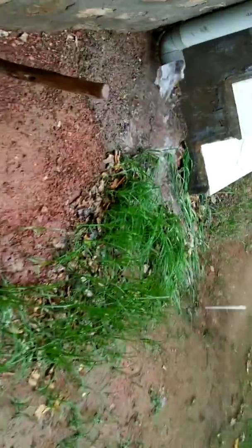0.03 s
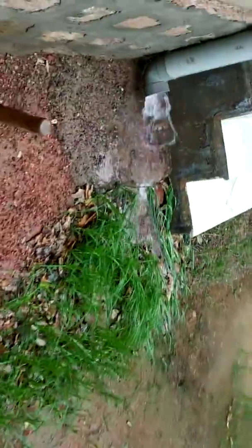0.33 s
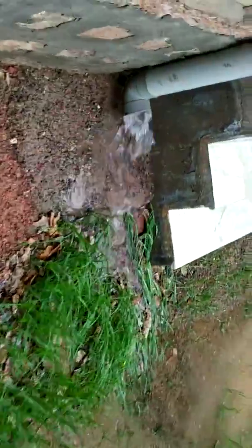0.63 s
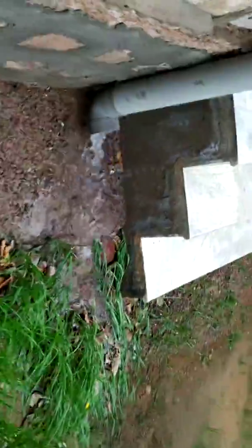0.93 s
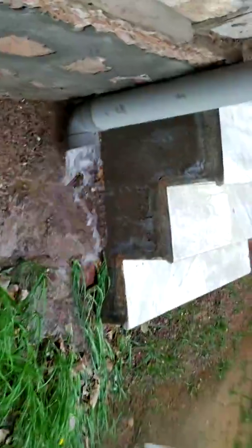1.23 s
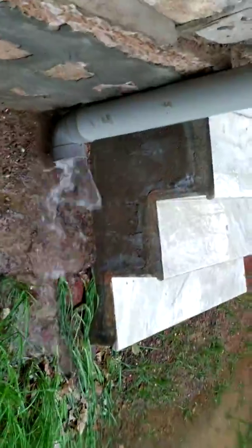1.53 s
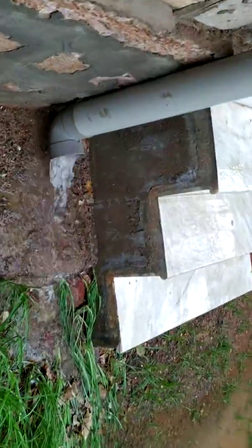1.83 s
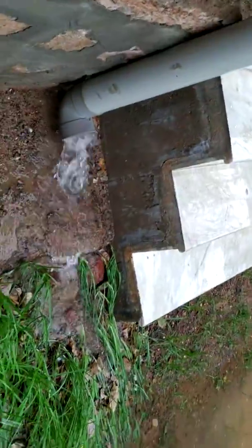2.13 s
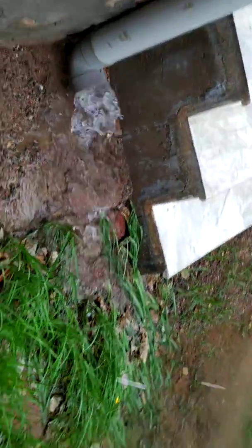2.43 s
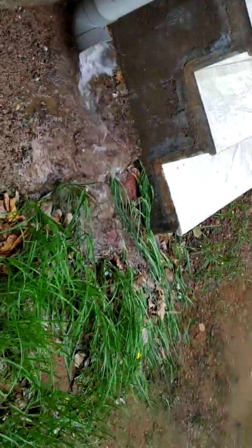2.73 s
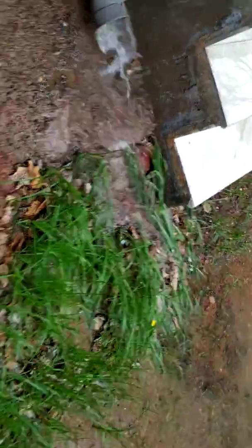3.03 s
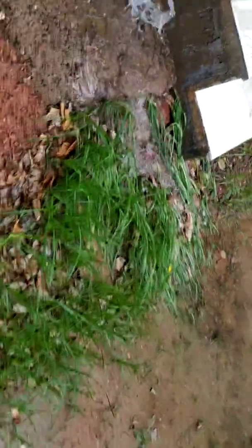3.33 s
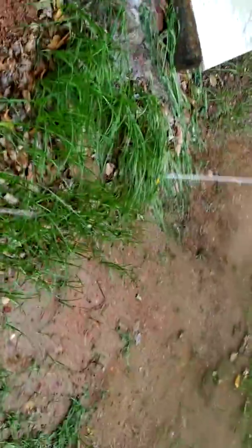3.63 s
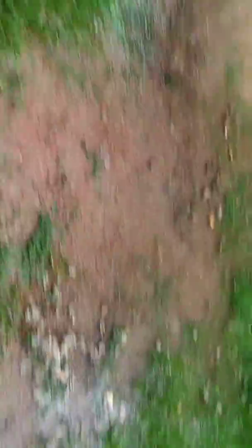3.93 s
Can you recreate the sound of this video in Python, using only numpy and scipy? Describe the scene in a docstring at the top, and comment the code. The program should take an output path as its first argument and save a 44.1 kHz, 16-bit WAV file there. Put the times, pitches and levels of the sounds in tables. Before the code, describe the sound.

Water gushes from a drainpipe and splatters onto wet gravel, with light wind rumble.

```python
"""Drainpipe on wet gravel

Rainwater gushes from a pipe beside a house wall. The uneven flow throws a fine spray, ticks on the
stones and traps ringing bubbles in the puddle; larger splats slap down and single drops snap close by.
Water churns at the pipe mouth and ripples away over the gravel. Light wind rumbles on the microphone."""
import sys
import numpy as np
from scipy import signal
from scipy.fft import rfft, irfft
from scipy.io import wavfile

SR = 44100
rng = np.random.default_rng(int(sys.argv[2]) if len(sys.argv) > 2 else 0)


def wav_out(sig):
    """Save sig, one row per channel (or a flat mono array), as 16-bit PCM at SR to the path in sys.argv[1]."""
    wavfile.write(sys.argv[1], SR, np.round(np.clip(np.atleast_2d(sig).T, -1, 1) * 32767).astype(np.int16))


N = 176400
TIME = np.arange(N) / SR
FLUTTER_DB, FLUTTERS_PER_S = 3, 51  # unevenness of the gurgle and the runoff

# The finest treble of spray and droplets. Each row: time in seconds, lift over the rest in dB.
TREBLE_LIFT = [(0, 3), (.7, 1), (1.3, -1), (1.8, 3), (2.2, 0), (2.8, 0), (3.3, -1), (3.6, 3.5), (4, 5)]


def from_db(db):
    """Decibels to gain."""
    return 10 ** (np.asarray(db) / 20)


def rms_one(x):
    """Scale to unit rms."""
    return x / np.sqrt(np.mean(x ** 2) + 1e-20)


def in_time(rows):
    """Read a curve at every sample."""
    return np.interp(TIME, *np.transpose(rows))


def at_hz(points, hz):
    """Read a spectrum on a log-frequency axis."""
    points_hz, points_db = np.transpose(points)
    return np.interp(np.log(hz), np.log(points_hz), points_db)


def drift(rate_hz):
    """A smooth random curve with a spread of about 1."""
    step, settle = 40, 2000
    pole = np.exp(-2 * np.pi * rate_hz * step / SR)
    noise = rng.standard_normal(N // step + settle + 2)
    slow = signal.lfilter([1], [1, -2 * pole, pole * pole], noise)[settle:]
    return np.interp(np.arange(N) / step, np.arange(len(slow)), rms_one(slow))


def band_noise(low_hz, high_hz):
    """Noise of unit rms between two edges."""
    sos = signal.butter(2, [low_hz, high_hz], "band", fs=SR, output="sos")
    return rms_one(signal.sosfilt(sos, rng.standard_normal(N)))


def drop_sizes(spread_db):
    """Many small drops and a few large ones, one gain per sample."""
    return from_db(spread_db * np.minimum(rng.exponential(1, N), 4.5))


def treble_gain(db, hz):
    """A gain that acts only above 9800 Hz."""
    return from_db(db * (hz > 9800))


def add(out, start_s, sound):
    """Mix a short sound in at its time."""
    i = int(np.clip(start_s * SR, 0, N - 1))
    out[i:i + len(sound)] += sound[:N - i]


def gush():
    """The pipe's output as a gain of unit rms: a steady flow, sloshes and quick chance surges."""
    # Strength of the steady flow. Each row: time in seconds, relative level in dB.
    steady_flow = [(0, -40.5), (.35, -41.5), (.6, -39), (.85, -40.5), (1.3, -35.5), (1.65, -37.5),
                   (2.05, -37.5), (2.7, -37.5), (3.0, -37.5), (3.4, -39.5), (3.7, -40.5), (4, -41.5)]
    # The pipe spills in sloshes. Each row: start in seconds, length in seconds, lift in dB.
    sloshes = [(0.09, 0.07, 0.5), (.25, 0.047, 5), (0.362, 0.16, 2), (0.63, 0.2, 1.1), (0.883, 0.12, 3.5),
               (1.266, 0.19, 2.5), (1.445, 0.15, 2.5), (1.739, 0.076, 5.5), (1.852, 0.13, 2),
               (2.091, 0.075, 1.5), (2.21, 0.11, 3.5), (2.373, 0.12, 4), (2.55, 0.13, 3),
               (2.673, 0.13, 2.8), (2.852, 0.13, 3), (3.09, 0.09, 3.5), (3.225, 0.08, 3.5),
               (3.463, 0.07, 3), (3.534, 0.088, 4), (3.757, 0.13, 3)]
    surge_db, slosh_edge_s = 1.05, 0.013
    db = in_time(steady_flow) + surge_db * drift(rate_hz=27)
    for start_s, length_s, lift_db in sloshes:
        inside_s = np.minimum(TIME - start_s, start_s + length_s - TIME)
        db += lift_db * np.clip(inside_s / slosh_edge_s + .5, 0, 1)
    return rms_one(from_db(db))


def spray(flow):
    """Each small splash is a burst of hiss a few milliseconds long, with a colour of its own."""
    # Colour of the spray. Each row: frequency in Hz, relative spectral density in dB.
    spectrum = [(300, 0), (600, -15.5), (1100, -6), (1600, -2.5), (2200, 2.5), (3000, 3.5), (4300, 2.5),
                (7000, -2), (9000, -1), (12000, -1.5), (16000, -18)]
    splashes_per_s, decay_s, colour_db = 600, 0.0064, 3
    hits = (rng.random(N) < splashes_per_s / SR) * drop_sizes(spread_db=1.5) * flow
    power_kept = np.exp(-2 / (decay_s * SR))
    edges_hz = np.geomspace(300, 17000, 17)
    treble_db, out = in_time(TREBLE_LIFT), 0
    for low, high in zip(edges_hz, edges_hz[1:]):
        strength = hits * from_db(colour_db * np.clip(rng.standard_normal(N), -2, 2))
        envelope = np.sqrt(signal.lfilter([1], [1, -power_kept], strength ** 2 + 1e-18))
        hiss = rms_one(envelope * treble_gain(treble_db, high) * band_noise(low, high))
        out += from_db(at_hz(spectrum, np.sqrt(low * high))) * np.sqrt(high - low) * hiss
    return from_db(-41.5) * rms_one(out)


def droplets(flow):
    """Droplets tick on the wet stones, each ringing a few cycles at its own pitch and bouncing once."""
    # Colour of the ticks. Each row: pitch in Hz, relative weight in dB.
    spectrum = [(500, -17), (1100, -1.5), (1600, -17.5), (2200, -2.5), (3000, -5.5), (4300, -0.5),
                (7000, -4.5), (9000, 0), (12000, -7), (16000, -1)]
    ticks_per_s, ring_cycles, longest_bounce_s, bounce_gain = 4200, 4, 0.0045, 0.82
    chance, sizes = rng.random((N, 4)), drop_sizes(spread_db=2.3) * flow
    born = np.flatnonzero(chance[:, 0] < ticks_per_s / SR)
    _, pitch, bounce, polarity = chance[born].T[:, :, None]
    hz, t = 500 + 15500 * pitch ** 1.3, TIME[:SR // 150]
    rings = np.sin(2 * np.pi * hz * t) * np.exp(-t * hz / ring_cycles) * (1 - t / t[-1])
    colour = hz * from_db(at_hz(spectrum, hz)) * treble_gain(in_time(TREBLE_LIFT)[born, None], hz)
    ticks = rings * np.sign(polarity - .5) * sizes[born, None] * colour
    first = born[:, None] + np.arange(len(t))
    second = first + (longest_bounce_s * bounce * SR).astype(int)
    landing, rebound = (np.bincount(at.ravel(), ticks.ravel(), N)[:N] for at in (first, second))
    return from_db(-41.5) * rms_one(landing + bounce_gain * rebound)


def bubble(hz, decay_cycles, churn):
    """A trapped bubble rings briefly, rising in pitch, shaken by the churning water; peak 1."""
    attack_cycles, rise_per_s, roughness = 1.03, 5.2, 0.47
    t = TIME[:len(churn)]
    envelope = (1 - np.exp(-t * hz / attack_cycles)) * np.exp(-t * hz / decay_cycles)
    phase = 2 * np.pi * hz * (t + rise_per_s * t * t / 2)
    ring = envelope * np.imag((1 + roughness * churn) * np.exp(1j * phase))
    return ring / np.abs(ring).max()


def puddle(flow):
    """Clear plops and a few low slaps among random low glugs, middle bubbles and tiny high pings."""
    # Clear bubble plops and a few short, low slaps of water (those that die in a cycle or two).
    # Each row: start in seconds, peak in dB, pitch in Hz, decay in cycles.
    plops_and_slaps = [(.235, -38.5, 1650, 6), (.283, -35.5, 2200, 7), (.402, -31, 1990, 7),
                       (.403, -34, 1620, 4.5), (0.421, -35, 1960, 7), (0.496, -34, 2690, 10),
                       (.784, -32, 4430, 12), (0.931, -32.5, 2380, 9), (0.933, -26, 8250, 14),
                       (1.043, -34, 2360, 8), (1.051, -40, 890, 3), (1.068, -33, 2370, 9),
                       (1.341, -27, 3200, 7.3), (1.365, -30, 3860, 10), (1.396, -25.5, 2840, 9),
                       (1.537, -31, 2190, 6.5), (1.551, -21, 11000, 14), (1.62, -39.5, 1110, 5.9),
                       (1.776, -35, 1660, 7), (1.793, -36, 1500, 5.4), (1.852, -39.5, 1140, 5),
                       (1.872, -29.5, 1850, 8), (1.906, -30, 2800, 12), (2.134, -24.5, 3440, 8),
                       (2.149, -33, 2400, 8), (2.19, -30, 2340, 7), (2.201, -29, 1930, 3.6),
                       (2.2023, -32.5, 1020, 2.1), (2.238, -30, 1550, 5.4), (2.298, -38, 750, 2),
                       (2.431, -30, 2320, 5), (2.562, -29.5, 2150, 7.7), (2.633, -30, 2370, 4.2),
                       (2.645, -40.5, 1320, 4.6), (2.654, -21.5, 3500, 5), (2.671, -28, 2430, 8),
                       (2.704, -36, 1420, 3.3), (2.707, -36, 480, 1.1), (2.708, -40, 950, 1.5),
                       (2.7498, -22.5, 2170, 12), (2.765, -36, 1760, 8.2), (2.781, -26.5, 2580, 8.6),
                       (2.849, -38, 1470, 6.9), (2.859, -28.5, 1980, 7), (2.86, -28.5, 2600, 7),
                       (3.164, -35.5, 1380, 6.7), (3.169, -33, 2180, 5.4), (3.2369, -20.5, 4840, 9),
                       (3.2378, -25, 4080, 8.6), (3.276, -29, 2430, 7.2), (3.365, -37.5, 1600, 3.6),
                       (3.463, -23, 5100, 12), (3.465, -30.5, 3270, 8), (3.562, -32, 1426, 5.2),
                       (3.887, -31.5, 2270, 9)]
    # Families of random bubbles. Each row: bubbles per second, typical peak in dB at unit flow,
    # centre pitch in Hz, spread in octaves.
    families = [(55.5, -54, 1100, 0.4), (170, -48, 2250, 0.304), (170.4, -42, 5600, 0.443),
                (170, -40.5, 11500, 0.24)]
    churn_hz, size_spread_db, splash_db, splash_decay_s = 350, 4, -17, 0.004
    out, length = np.zeros(N), SR // 25
    churn = np.pad(drift(churn_hz) + 1j * drift(churn_hz), (0, length))
    splash, fade = band_noise(1700, 6500), np.exp(-TIME[:length] / splash_decay_s)
    for start_s, db, hz, cycles in plops_and_slaps:
        i = int(start_s * SR)
        add(out, start_s, from_db(db + splash_db) * fade * splash[i:i + length])
        add(out, start_s, from_db(db) * bubble(hz, cycles, churn[i:i + length]))
    for per_s, db, centre_hz, octaves in families:
        chance = np.clip(rng.standard_normal((N, 2)), -2.5, 2)
        for i in np.flatnonzero(rng.random(N) < per_s / SR):
            strength, pitch = chance[i]
            gain = flow[i] * from_db(db + size_spread_db * strength)
            hz = centre_hz * 2 ** (octaves * pitch)
            cycles = 6.8 * (hz / 2300) ** 0.47  # smaller bubbles ring for more cycles
            add(out, i / SR, gain * bubble(hz, cycles, churn[i:i + length]))
    return out


def gurgle():
    """Water churns at the pipe mouth: a hollow, wandering resonance over a broader, lower wash."""
    # The wash, before its flutter. Each row: time in seconds, level in dB.
    wash_level = [(0, -54), (.8, -56), (1.6, -60), (2.2, -62), (3.2, -66), (4, -61)]
    centre_hz, width_hz, wander_hz = 2173, 420, 108.9
    flutter = from_db(FLUTTER_DB * drift(FLUTTERS_PER_S))
    hollow = signal.hilbert(band_noise(centre_hz - width_hz / 2, centre_hz + width_hz / 2))
    wander = np.exp(2j * np.pi * np.cumsum(wander_hz * drift(rate_hz=7)) / SR)
    wash = from_db(in_time(wash_level) + FLUTTER_DB * drift(FLUTTERS_PER_S)) * band_noise(1310, 2170)
    return from_db(-55) * rms_one(flutter * np.real(hollow * wander)) + wash


def runoff():
    """The overflow ripples softly away over the gravel."""
    # The fading ripple, before its flutter. Each row: time in seconds, level in dB.
    ripple_level = [(0, -61), (1.2, -67), (2.2, -74), (4, -78)]
    return from_db(in_time(ripple_level) + FLUTTER_DB * drift(FLUTTERS_PER_S)) * band_noise(650, 1150)


def wind():
    """Low turbulence on the microphone, swelling and easing."""
    # Colour of the rumble. Each row: frequency in Hz, relative spectral density in dB.
    spectrum = [(18, -2.5), (35, 2), (60, 1), (100, -4.5), (170, -7.5), (250, -16), (400, -24.5),
                (550, -28), (800, -31.5), (1800, -61)]
    # Strength of the wind. Each row: time in seconds, relative level in dB.
    swell = [(0, -34.5), (.3, -36.5), (.9, -36), (1.5, -38.3), (1.85, -41), (2.4, -39), (2.9, -36.5),
             (3.3, -35), (3.65, -41), (4, -40.5)]
    hz = np.maximum(np.arange(N // 2 + 1) * SR / N, 1)
    rumble = irfft(rfft(rng.standard_normal(N)) * from_db(at_hz(spectrum, hz)), N)
    return from_db(in_time(swell) + 0.5) * rms_one(rumble)


def buffets():
    """Now and then the wind buffets the microphone with a low flutter."""
    # Each row: time of the crest in seconds, half length in seconds, level in dB, centre in Hz.
    gusts = [(0.04, 0.07, -38.5, 165), (0.44, 0.035, -39, 172), (0.54, 0.06, -36, 168), (.9, .08, -39, 95),
             (1.5, .12, -44, 125), (3.102, 0.54, -55, 328)]
    edge_ratio, out = 1.25, 0
    for crest_s, half_s, db, hz in gusts:
        envelope = from_db(db) * np.exp(-((TIME - crest_s) / half_s) ** 2)
        out += envelope * band_noise(hz / edge_ratio, hz * edge_ratio)
    return out


def splats():
    """Lumps of water slap the ground: each a sharp, unevenly coloured crack and a faint tail of spray."""
    # The loudest splats. Each row: start in seconds, low, middle and high band levels in dB
    # (as if the energy were spread over window_s), decay in seconds.
    slaps = [(0.104, -60, -41, -41, 0.0012), (.260, -42.5, -56, -33, 0.0032), (.285, -46, -46, -39, .003),
             (.642, -38.5, -52, -40, 0.0012), (.648, -43, -40, -44, .003), (.785, -39, -40.5, -47, 0.0051),
             (.799, -40, -40, -47, 0.0038), (0.8876, -47, -44.5, -33.5, 0.0021),
             (.932, -47, -42, -40, 0.0024), (1.018, -44, -40.5, -38.5, 0.004),
             (1.070, -46, -41, -35, 0.0041), (1.114, -43, -36, -34.5, 0.0034),
             (1.3311, -41, -34, -32.5, 0.0051), (1.341, -42, -38, -42, 0.0022),
             (1.366, -42, -40, -49, 0.0025), (1.501, -40, -50, -34, 0.0026), (1.657, -47, -49, -31, 0.001),
             (1.711, -38, -40, -34, 0.0022), (1.876, -35, -32.5, -28, 0.0044),
             (1.96, -54, -43, -29, 0.0059), (2.134, -42, -36, -30, 0.0017),
             (2.291, -44, -45, -33.5, 0.0034), (2.431, -36, -36, -28, 0.0038),
             (2.654, -55, -33, -33, 0.0013), (2.702, -41, -32, -33, 0.0035), (2.710, -40, -44, -28, .002),
             (2.773, -43, -34, -37, 0.0023), (2.844, -56, -33, -40, .0012),
             (3.049, -44, -37.5, -32.5, 0.0038), (3.109, -56, -37, -33, 0.0041),
             (3.2372, -41.5, -34, -30.5, 0.0022), (3.364, -43, -35, -38, .004),
             (3.464, -37.5, -28, -32.5, 0.0028), (3.581, -48, -39, -31.5, .003),
             (3.772, -59, -47, -36, 0.003)]
    # The low, middle and high bands of a splat. Each row: lower and upper edge in Hz.
    bands = [(1600, 3200), (3000, 7020), (7000, 15000)]
    attack_share, tail_gain, tail_s, window_s, colour_db = 0.2, 0.059, 0.034, 0.006, 2
    t, shapes, out = TIME[:SR // 10], [], 0
    for *_, decay_s in slaps:
        attack = np.minimum(t / (attack_share * decay_s), 1) ** 2
        shape = attack * (np.exp(-t / decay_s) + tail_gain * np.exp(-t / tail_s))
        shapes.append(shape * np.sqrt(window_s * SR / np.sum(shape ** 2)))
    for k, band in enumerate(bands):
        edges_hz = np.geomspace(*band, 4)  # three slices share the band's power
        for low, high in zip(edges_hz, edges_hz[1:]):
            envelope = np.zeros(N)
            for (start_s, *band_db, _), shape in zip(slaps, shapes):
                add(envelope, start_s, from_db(band_db[k] + colour_db * rng.uniform(-1, 1)) * shape)
            out += envelope * band_noise(low, high) / np.sqrt(3)
    return out


def snaps():
    """Single drops hit bare stone close by: an instant crack with a very short high ring."""
    # Each row: start in seconds, level in dB, pitch in Hz, decay in seconds.
    drops = [(.447, -25, 13000, .0004), (.6423, -16, 14500, .0004), (.6435, -20, 11500, .0005),
             (1.1461, -15, 11400, .0008), (1.332, -18, 12000, .0007), (1.502, -19, 12800, .0007),
             (1.637, -23, 14500, .0005), (1.6572, -13.5, 13500, .0003), (2.3308, -20, 14500, .0007),
             (2.5515, -14, 13500, .0003), (2.7105, -19, 9000, .001)]
    out, t = np.zeros(N), TIME[:SR // 200]
    hiss = band_noise(7000, 15500)
    for start_s, db, hz, decay_s in drops:
        ring = .7 * np.sin(2 * np.pi * hz * t)
        crack = .45 * hiss[int(start_s * SR):][:len(t)]
        add(out, start_s, from_db(db) * (ring + crack) * np.exp(-t / decay_s))
    return out


def scene():
    """At one microphone: the same uneven flow drives spray, droplets and bubbles; wind lies beneath."""
    flow = gush()
    water = spray(flow) + splats() + snaps() + droplets(flow) + puddle(flow) + gurgle() + runoff()
    return (water + wind() + buffets())[None]


def record(dry):
    """The treble is cut steeply above 15900 Hz."""
    return signal.sosfilt(signal.ellip(12, .2, 80, 15900, fs=SR, output="sos"), dry)


dry = scene()
out = record(dry)
wav_out(out)
```